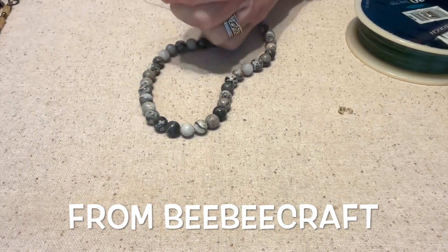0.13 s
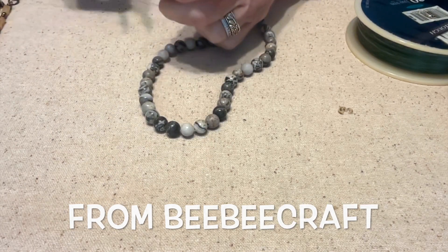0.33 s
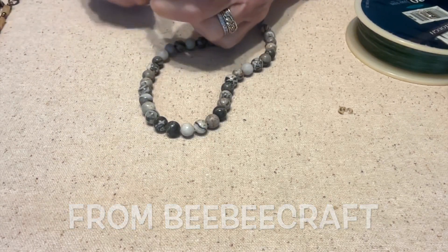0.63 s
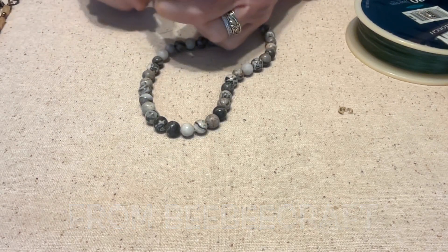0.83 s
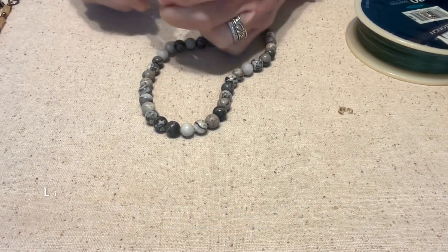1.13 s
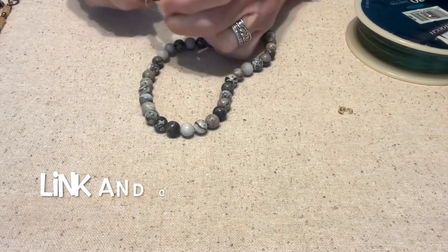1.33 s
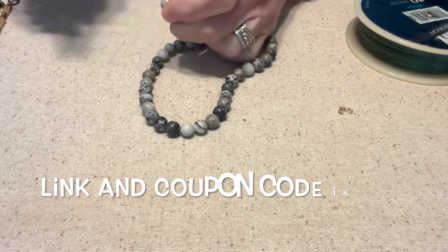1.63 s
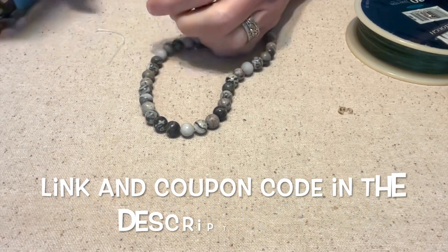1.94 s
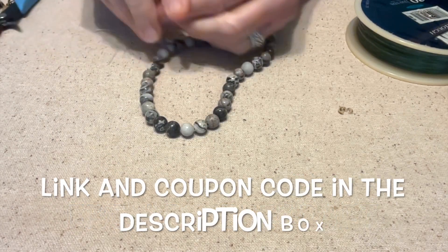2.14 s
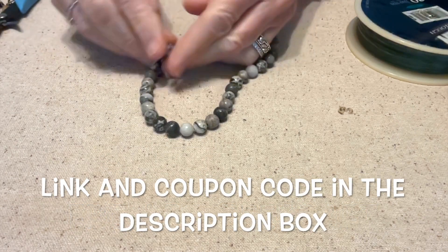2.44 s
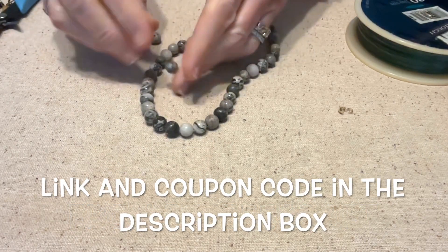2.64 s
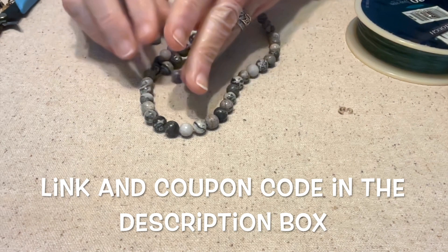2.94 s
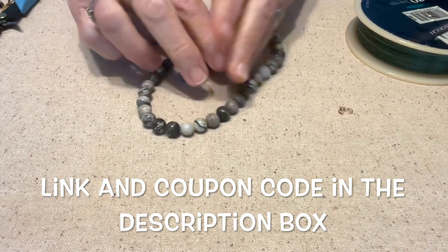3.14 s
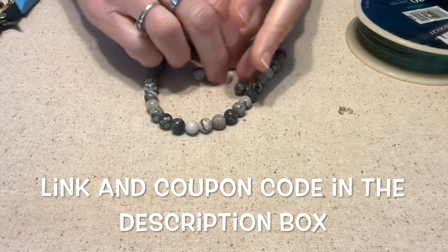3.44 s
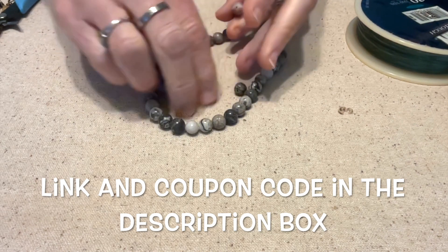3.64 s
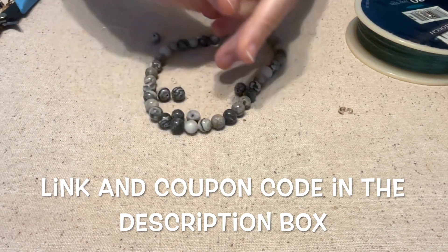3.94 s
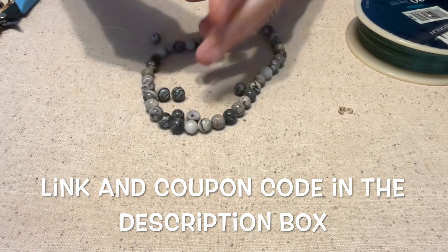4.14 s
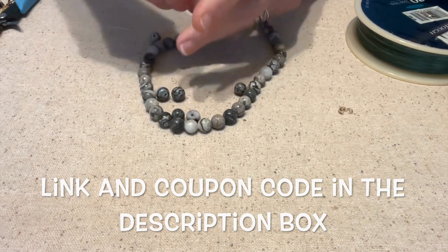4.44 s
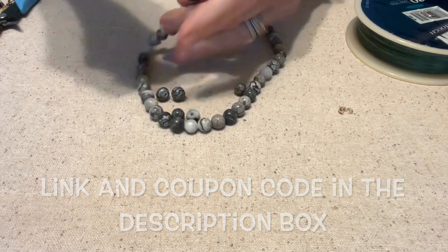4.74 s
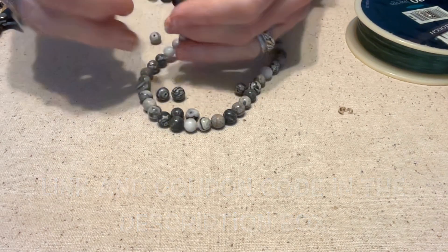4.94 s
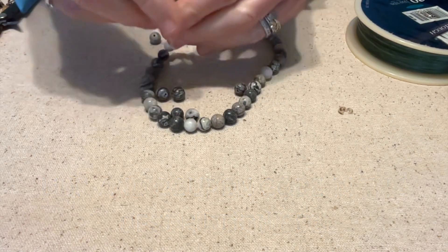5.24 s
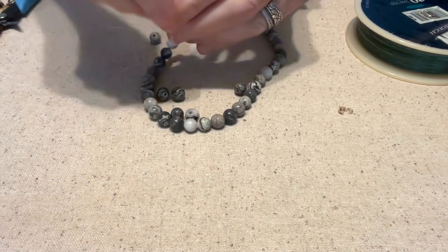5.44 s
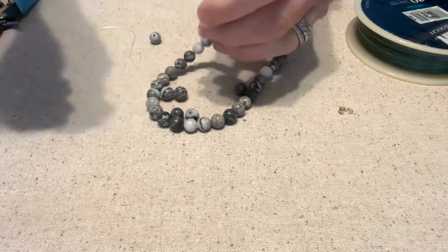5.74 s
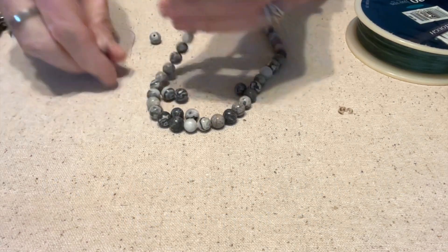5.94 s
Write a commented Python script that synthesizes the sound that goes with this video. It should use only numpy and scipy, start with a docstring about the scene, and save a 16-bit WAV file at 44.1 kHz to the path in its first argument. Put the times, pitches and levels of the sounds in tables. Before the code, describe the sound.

A small, quiet indoor room with faint low rumble and hiss, heard close in mono. At 0 seconds there is a soft, dull bump and brief cloth rub, then tiny bead ticks around 0.3 to 0.5 and faint metal ticks at 0.65 and 0.83. At 1.45 a hard, bright steel snap, like cutters going through wire, far louder than everything else, bounces briefly off the walls. From 1.92 to 2.15 the tool is laid down: a woody double knock, low thump and short rattle. Fingers rub softly over cloth from 2.2 to 3.8, with crisp stone clicks at 2.9 and a busy cluster from 3.4 to 3.96. Sparser clicks and light taps follow, clearest at 4.73, then a small tap and clicks at 5.6 to 5.72. A last sharp bead clack comes at 6.06 amid soft brushing.

```python
"""Beads and cutters on a cloth-covered table

Stone beads are handled close to the microphone in a small, quiet room: contact pulses, with rebounds, click.
A sharp snap, likely cutters going through beading wire, rings steel modes and spreads to the walls.
The tool is put down with a knock and a rattle: force pulses drive table modes, noise bursts clatter.
Fingers brush the cloth throughout, as shaped and resonated random slips, and loose beads click on the strand."""
import sys
import numpy as np
from scipy import signal
from scipy.fft import rfft, irfft
from scipy.io import wavfile

SR = 44100
rng = np.random.default_rng(int(sys.argv[2]) if len(sys.argv) > 2 else 0)


def store_pcm(level_fs):
    """Save levels as 16-bit WAV."""
    pcm = np.round(np.clip(level_fs, -1, 1) * 32767).astype(np.int16)
    wavfile.write(sys.argv[1], SR, np.atleast_2d(pcm).T)


N = 268392
TIME = np.arange(N) / SR
CLACK_HZ = 9000  # pitch of a typical bead click

# fingers sweep over the cloth, levels before the stroke's arch and any trim:
# [start t/s, length t/s, rub level/dB, brush level/dB, brush pitch f/Hz, fizz level/dB]
STROKES = [(0, 0.062, -59, -71, 920, -69), (0.327, 0.1, -99, -99, 5250, -71.5),
           (2.199, 0.13, -77, -72, 1264, -68.5), (2.392, 0.19, -66.5, -75, 1410, -72.5),
           (2.56, 0.35, -88, -74, 1170, -85.5), (2.645, 0.13, -67.5, -70.5, 373, -85),
           (2.744, 0.17, -64.5, -71, 1193, -74.5), (2.872, .14, -69, -72, 1090, -88),
           (3.118, 0.095, -85, -72, 568, -94.5), (3.168, .17, -83.5, -75.5, 1326, -76),
           (3.342, 0.18, -71, -77.5, 1136, -79.5), (3.505, 0.066, -60.5, -64.5, 1180, -72),
           (3.537, 0.059, -60, -69, 750, -63), (3.574, 0.24, -66.5, -72, 920, -68),
           (4.343, 0.11, -88, -82, 1206, -78), (4.573, 0.098, -71.5, -85, 1200, -82.5),
           (5.122, .09, -67.5, -91, 1070, -86), (5.31, 0.14, -80.5, -84, 1090, -82.5),
           (5.448, 0.18, -80, -81.5, 1315, -74), (5.6, 0.096, -66, -74, 2480, -71),
           (5.678, 0.068, -85, -74, 2423, -63), (5.949, 0.69, -65.5, -70, 1111, -72.5)]
# spectrum of a light tap, relative: [f/Hz, level/dB]
TAP_SPECTRUM = [(100, -19.5), (360, 1), (580, 1.5), (830, -3.5), (1250, -10.5), (1900, -25.5), (2800, -25),
                (5000, -34), (10000, -40)]


def amp(db):
    """Level to amplitude: 20 dB is a factor of ten."""
    return 10 ** (np.asarray(db) / 20)


def evened(x):
    """Power normalization: scales to rms 1."""
    return x / np.sqrt(np.mean(x ** 2) + 1e-20)


def read(points, hz):
    """Interpolates (f/Hz, value) points linearly on a logarithmic frequency axis."""
    f, value = np.transpose(points)
    return np.interp(np.log(hz + 1), np.log(f + 1), value)


def add(mix, s, sound):
    """Superposition: mixes a sound in at time s."""
    part = mix[max(round(s * SR), 0):][:len(sound)]
    part += sound[:len(part)]


def coloured(x, spectrum):
    """Linear filtering: weights the spectrum of x, then scales to rms 1."""
    gain = amp(read(spectrum, np.fft.rfftfreq(len(x), 1 / SR)))
    return evened(irfft(rfft(x) * gain, len(x)))


def causal(db):
    """Minimum phase: the most compact pulse with this spectrum and nothing before its start."""
    log_gain = np.log(amp(np.r_[db, db[-2:0:-1]]))
    minimum_phase = np.exp(np.conj(signal.hilbert(log_gain)))
    return irfft(minimum_phase[:len(db)])


def ring(modes, t):
    """Modal superposition: dying sines, neighbouring modes swinging in opposite directions."""
    return sum((-1) ** k * amp(db - 60 * t / t60) * np.sin(2 * np.pi * hz * t)
               for k, (hz, db, t60) in enumerate(modes))


def crowded(spectrum, t60):
    """High modal density: modes too many to tell apart become fresh decaying noise."""
    t = np.arange(SR // 4) / SR
    return coloured(rng.standard_normal(len(t)), spectrum) * amp(-60 * t / t60)


def struck(events, modes, detune=0.056):
    """Modal excitation: each contact shifts the modes at random and tilts their levels per octave."""
    out, t = np.zeros(N), np.arange(SR // 10) / SR
    hz, level, t60 = np.transpose(modes)
    for (s, db, tilt_db), shift in zip(events, rng.standard_normal((len(events), len(modes)))):
        levels = level + tilt_db * np.log2(hz / hz[0])
        ping = ring(zip(hz * np.exp(detune * shift), levels, t60), t)
        add(out, s, amp(db) * ping / abs(ping).max())
    return out


def light_contacts(events, spectrum, contact_db):
    """Impulse response: one contact pulse over crowded modes that die with no clear pitch."""
    out, pulse = np.zeros(N), causal(read(spectrum, np.fft.rfftfreq(1024, 1 / SR)))
    for s, db, t60 in events:
        tap = crowded(spectrum, t60)
        add(out, s, amp(db) * tap / abs(tap).max())
        add(out, s, amp(db + contact_db) * pulse / abs(pulse).max())
    return out


def room(x, wet_db, build_s):
    """Diffuse reverberation: reflections swell briefly, then decay at a rate set by frequency."""
    # reverberation time: [f/Hz, t60/s]
    decay_times = [(100, 0.91), (500, 0.31), (2000, 0.21), (5500, 0.22), (9000, 0.23), (15000, 0.29)]
    hz, t, z = signal.stft(rng.standard_normal(SR // 2), SR, nperseg=256)
    decay = amp(-60 * t / read(decay_times, hz)[:, None])
    tail = signal.istft(z * decay, SR, nperseg=256)[1]
    tail *= 1 - np.exp(-(np.arange(len(tail)) / SR / build_s) ** 2)
    return amp(wet_db) * signal.fftconvolve(x, tail / np.linalg.norm(tail))[:N]


def near_echo(x, delay_s, echo_db):
    """Specular reflection: one delayed copy from a surface close above the table."""
    return x + amp(echo_db) * np.interp(TIME - delay_s, TIME, x, left=0)


def wander(rate_hz):
    """Band-limited randomness: a Gaussian low-pass leaves a smooth curve of rms 1."""
    below = np.exp(-(np.fft.rfftfreq(N, 1 / SR) / rate_hz) ** 2)
    return evened(irfft(rfft(rng.standard_normal(N)) * below, N))


def slips(size, grain_db=0.5, slips_per_s=4000):
    """Stick-slip friction: skin and beads catch on the weave in tiny slips at random instants."""
    force = rng.standard_normal(size)
    boost = amp(grain_db * np.minimum(rng.exponential(1, size), 5))  # a few slips stand out
    occurs = rng.random(size) < slips_per_s / SR
    return force * boost * occurs


def resonate(x, hz, width_hz):
    """Heterodyning: a one-pole resonance follows the curve hz."""
    turn = np.exp(2j * np.pi * np.cumsum(hz) / SR)
    r = np.exp(-np.pi * width_hz / SR)
    return 2 * (turn * signal.lfilter([1 - r], [1, -r], x / turn)).real


def arch(share):
    """Contact pressure: one arch a stroke, peaking before its middle."""
    skew, power = 0.56, 0.99  # skew under 1 peaks early; a higher power narrows the arch
    return abs(np.sin(np.pi * np.clip(share, 0, 1) ** skew)) ** power


def pressure():
    """Friction follows normal force: gains of the low rub and of the fizz over time."""
    rub, fizz = np.zeros(N), np.zeros(N)
    for start, length, rub_db, _, _, fizz_db in STROKES:
        press = arch(np.arange(0, length, 1 / SR) / length)
        add(rub, start, amp(rub_db) * press)
        add(fizz, start, amp(fizz_db) * press)
    return rub, fizz


def background(air_db=-68.5):
    """Stationary noise: steady room rumble and hiss with a trace of electrical whine."""
    # quiet room and microphone hiss, relative density: [f/Hz, level/dB per Hz]
    air_spectrum = [(20, -18.5), (42, -9.5), (70, -1), (105, -11), (165, -15), (290, -17.5), (500, -20),
                    (720, -24.5), (1800, -30), (3000, -37), (5000, -36), (8200, -24.5), (11500, -41.5),
                    (14000, -28.5), (16000, -40)]
    # faint electrical tones: [f/Hz, rms level/dB]
    whines = [(3747, -94), (5243, -107), (5604, -100.5)]
    air = amp(air_db) * coloured(rng.standard_normal(N), air_spectrum)
    whine = sum(np.sqrt(2) * amp(db) * np.sin(2 * np.pi * hz * TIME) for hz, db in whines)
    return air + whine


def cloth(fizz_trim_db=-1, flutter_db=1.5):
    """Friction noise: fingers stir the table in a low rub and the threads in a fizz; the level flutters."""
    # relative densities of rub and fizz: [f/Hz, level/dB per Hz]
    rub_spectrum = [(30, 2.5), (100, 11), (300, -3.5), (600, -6.5), (1150, -6.5), (2000, -21.5),
                    (4000, -17), (7000, -39)]
    fizz_spectrum = [(2000, 3), (2600, 0), (5000, 1.5), (9000, 12.5), (12000, -3.5), (14500, 13),
                     (16500, -13)]
    rub_gain, fizz_gain = pressure()
    rub = rub_gain * coloured(slips(N), rub_spectrum)
    fizz = amp(fizz_trim_db) * fizz_gain * coloured(slips(N), fizz_spectrum)
    return (rub + fizz) * amp(flutter_db * wander(rate_hz=85))


def brushes(width=0.9, rise_octaves=0.99, waver_octaves=0.27):
    """Filtered friction: fingertips hiss over the weave at a rising, wavering resonance."""
    out, waver = np.zeros(N), wander(rate_hz=14)
    for start, length, _, db, hz, _ in STROKES:
        share = np.arange(0, length, 1 / SR) / length
        drift = waver_octaves * np.interp(start + share * length, TIME, waver)
        pitch = hz * 2 ** (rise_octaves * (share - .5) + drift)
        hiss = slips(len(share))
        for _ in range(2):
            hiss = resonate(hiss, pitch, width * hz)
        add(out, start, amp(db) * arch(share) * evened(hiss))
    return out


def table_blows(board_db=-19, board_t60=0.12):
    """Force bandwidth: pulses rounded by the cloth ring the top; softer blows reach only its low modes."""
    # from soft fingertips to the hard tool: [t/s, drive level/dB, corner of the force f/Hz]
    blows = [(.002, -26, 65), (0.046, -12, 25), (0.069, -48, 1090), (1.4495, -48.5, 599),
             (1.9216, -18.5, 297), (1.9306, -27.5, 270), (1.9604, -13, 640), (1.9697, -21, 1975),
             (2.0027, -11, 113), (2.059, -33.5, 630), (2.0755, -27, 58), (2.0964, -29.5, 208),
             (2.1337, -28.5, 67.4), (2.1985, -24, 62.5), (2.944, -33.5, 87.6), (2.954, -37, 84),
             (3.56, -28, 30.8), (3.661, -35.5, 30.2), (3.761, -39, 93), (3.771, -40.5, 93),
             (4.814, -32.5, 43.8), (5.318, -42.5, 70), (5.6, -65.5, 924), (5.621, -42, 31.7),
             (6.051, -35.5, 128)]
    # separate modes of the table top: [f/Hz, relative level/dB, t60/s]
    top_modes = [(35.5, -21, 0.93), (52.9, -20, 0.63), (80.6, -17.5, 0.47), (93.2, -0.9, 0.065),
                 (112, -13.0, 0.366), (128, -9, 0.133), (165.3, 5, 0.13), (173.8, 4.5, 0.086),
                 (229, -23.5, 0.279), (263.3, -7, 0.22), (325.4, -2.5, 0.068), (356, -19.5, 0.198),
                 (407.6, -3.5, 0.12), (479, -10, 0.07), (542, -12, 0.102), (656.4, -21, 0.16),
                 (699, -18, 0.11), (705.1, -3, 0.043), (775, -7.5, 0.05), (864, -7.5, 0.043),
                 (956.5, -10.5, 0.052), (1067.9, -16, 0.068)]
    # its crowded higher modes, relative: [f/Hz, level/dB]
    board_spectrum = [(100, -36), (400, -20.5), (650, -6.5), (880, 0), (1060, -1.5), (1250, -3.5),
                      (2000, -8.5), (4000, -14), (8000, -34)]
    out, t = np.zeros(N), np.arange(SR) / SR
    low_modes = ring(top_modes, t)
    for s, db, hardness_hz in blows:
        u = 2 * np.pi * hardness_hz * t[:SR // 10]
        force = u ** 2 * np.exp(-u)
        push = force * amp(db) / force.sum()
        add(out, s, signal.fftconvolve(push, low_modes))
        add(out, s, signal.fftconvolve(push, amp(board_db) * crowded(board_spectrum, board_t60)))
    return out


def table_taps():
    """Weak impact: light taps on the cloth-covered top excite a brief, unpitched response."""
    # [t/s, peak level of the decaying part/dB, t60/s]
    taps = [(.0694, -49.5, 0.17), (2.0592, -45, 0.081), (2.096, -52, 0.25), (2.914, -54, .047),
            (3.083, -69, 0.028), (3.5462, -58, .045), (3.738, -59, .025), (4.2072, -51.5, 0.046),
            (5.6002, -47.5, 0.057), (5.7182, -53.5, 0.016)]
    return light_contacts(taps, TAP_SPECTRUM, contact_db=-7)


def rebounds(s, db, gap_s, shrink, loss_db, rest_s):
    """Inelastic rebound: contacts (s, dB) come sooner and weaker until the gap is too short, at most six."""
    contacts = [(s, db)]
    while gap_s > rest_s and len(contacts) < 6:
        s, db, gap_s = s + gap_s, db - loss_db, gap_s * shrink
        contacts.append((s, db))
    return contacts


def nudges(still_db=-80):
    """Poisson process: moving fingers jostle beads, louder under more fizz: (s, peak dB, pitch Hz)."""
    per_s, over_fizz_db, spread_db = 20, 12.5, 5  # level over the fizz before its trim
    fizz_db = 20 * np.log10(pressure()[1] + 1e-9)
    at = np.flatnonzero((rng.random(N) < per_s / SR) & (fizz_db > still_db))
    return [(i / SR, fizz_db[i] + over_fizz_db + spread_db * size, CLACK_HZ * np.exp(.12 * pitch))
            for i, (size, pitch) in zip(at, rng.standard_normal((len(at), 2)))]


def beads(scatter_db=-6, scatter_t60=0.012):
    """Stiff impact: stone hardly rings; each contact is a short pulse scattered by fingers and nearby beads."""
    # bead meets bead: [t/s, peak level/dB, pitch f/Hz, time to first rebound t/s (none at or below rest_s),
    # focus (under 1 a broad clack, over 1 a thin tick)]
    bead_hits = [(.256, -45, 9800, 0.0073, 1.5), (.301, -40.5, 8400, 0.0046, 1.3),
                 (.47, -52, 10000, 0.0048, 2.5), (2.914, -23, 9700, 0.0054, 1.05),
                 (2.9445, -25.5, 9400, .0038, 0.95), (3.14, -42, 8900, 0.0094, 0.89),
                 (3.3969, -31, 10430, 0, 0.8), (3.5461, -35, 7000, 0.0025, 0.43),
                 (3.645, -44, 11610, 0, 1.2), (3.667, -40, 10510, 0, 0.99),
                 (3.6891, -27, 10200, 0.006, 1.26), (3.7, -29, 9800, .004, 0.79),
                 (3.738, -21, 9000, 0, 0.97), (3.758, -36, 10850, 0.00064, 1.3),
                 (3.765, -28.5, 9500, 0.013, .9), (3.845, -24, 9060, 0.001, 0.89),
                 (3.9564, -33.5, 9070, 0, 0.85), (4.207, -38.5, 9310, 0.0079, 1.6),
                 (4.3834, -42.5, 7060, .0014, 0.52), (4.5336, -42, 8150, 0.0028, 0.81),
                 (4.7298, -24.5, 9360, .0036, 0.9), (4.756, -42, 9000, 0.00069, 1.2),
                 (4.8131, -37.5, 9160, 0.0077, 0.95), (4.822, -36, 9100, 0.0099, 0.84),
                 (5.5972, -38, 8200, 0.0031, 0.92), (5.5998, -31, 7300, 0.0062, 0.66),
                 (5.718, -30.5, 10660, 0.0015, 1.37), (6.063, -23.5, 10020, 0, 1.3),
                 (6.064, -23, 10040, 0.0014, 1.18), (6.0648, -31, 9400, 0.01, 1)]
    # relative spectrum at pitch CLACK_HZ and focus 1: [f/Hz, level/dB]
    clack_spectrum = [(200, -5.5), (1000, -17.5), (2500, -14), (4000, -9.5), (5500, -10), (7000, -2.5),
                      (9000, 2.5), (10500, -4), (12500, -5.5), (15000, -11), (20000, -4), (26000, -12),
                      (36000, -29)]
    out, hz, t = np.zeros(N), np.fft.rfftfreq(512, 1 / SR), np.arange(512) / SR
    contacts = []
    for start, first_db, pitch, gap_s, focus in bead_hits:
        for s, db in rebounds(start, first_db, gap_s, shrink=0.46, loss_db=11.5, rest_s=.0022):
            contacts.append((s, db, pitch, focus))
    contacts += [(s, db, pitch, 1) for s, db, pitch in nudges()]
    for s, db, pitch, focus in contacts:
        paths = rng.standard_normal(len(t)) * amp(-60 * t / scatter_t60)
        paths *= amp(scatter_db) / np.linalg.norm(paths)
        paths[0] = 1  # the direct path
        pulse = causal(focus * read(clack_spectrum, hz * CLACK_HZ / pitch))
        click = np.convolve(pulse, paths)
        add(out, s, amp(db) * click / abs(click).max())
    return near_echo(out, delay_s=0.0027, echo_db=-13.0)


def tool_pings():
    """Modal excitation: light touches ring the open steel tool."""
    # touches: [t/s, peak level/dB, tilt/dB per octave]
    touches = [(.6473, -41.5, 0.5), (.6499, -53, -4.5), (.656, -53, 4), (.666, -50, -1), (.8285, -40, 0.5),
               (.834, -55, -1), (.845, -55, -0.5), (2.1157, -42.5, -4), (2.242, -38.5, 3), (3.97, -42, 18)]
    # modes of the open tool: [f/Hz, relative level/dB, t60/s]
    tool_modes = [(1270, -9.5, 0.012), (1790, -5, 0.011), (2920, 3, 0.0054), (4130, 1, 0.012),
                  (5170, 2, 0.0099), (6300, -1, 0.0096), (9640, 2.5, 0.0075), (13370, 4, .005)]
    return struck(touches, tool_modes)


def scuffs(width=0.38, fall_octaves=0.32):
    """Stick-slip: a fingertip or bead catches on the weave in sparse, coarse slips that sink in pitch."""
    # [start t/s, length t/s, level before the arch/dB, mid-scuff pitch f/Hz]
    drags = [(1.041, 0.033, -76, 1420), (2.432, 0.035, -75, 980), (2.441, 0.11, -78.5, 2200),
             (2.64, 0.067, -76.5, 744), (2.695, 0.044, -82, 1920), (2.787, 0.095, -73, 1040),
             (2.77, .09, -78, 2670), (3.136, 0.048, -74.5, 660), (3.231, 0.037, -75, 1280),
             (3.514, 0.031, -66.5, 2130), (3.577, 0.043, -76, 2000), (3.679, 0.053, -69, 2560),
             (4.603, 0.058, -79.5, 1290), (5.15, 0.047, -78, 736), (5.33, 0.045, -80, 1170),
             (5.369, 0.025, -76, 700), (5.465, 0.037, -76.5, 1250), (5.647, 0.024, -74.5, 3400),
             (5.696, 0.026, -67.5, 2400)]
    out = np.zeros(N)
    for start, length, db, hz in drags:
        share = np.arange(0, length, 1 / SR) / length
        pitch = hz * 2 ** (fall_octaves * (.5 - share))
        rasp = slips(len(share), grain_db=1.0, slips_per_s=700)
        for _ in range(2):
            rasp = resonate(rasp, pitch, width * hz)
        add(out, start, amp(db) * arch(share) * evened(rasp))
    return out


def cutters(walls_db=-6.0, jaw_bounce_s=.00056, bounce_db=-4, body_db=-38):
    """Impact and radiation: jaws meet twice and ring the steel; walls return the sound of all directions."""
    # the jaws shut on the wire: [t/s, peak level of the first contact's steel ring/dB]
    snaps = [(1.4495, -2.5)]
    # modes of the cutters: [f/Hz, relative level/dB, t60/s]
    steel_modes = [(340, -29.5, 0.012), (1255, -24.5, 0.0064), (2018, -19.5, 0.011), (3439, -21, 0.0075),
                   (5010, -29, 0.0039), (5288, -20.5, 0.012), (5760, -22.5, 0.01), (6940, 0, 0.0024),
                   (8770, 1.5, 0.0028), (9390, 0.5, 0.005), (10900, -14, 0.0021), (11990, -11, 0.0036),
                   (14000, -19, 0.006), (15434, -23, 0.0053)]
    # the sprung handles ring on faintly: [f/Hz, level relative to the snap's/dB, t60/s]
    handle_modes = [(1780.6, -54, .22), (2016, -52, 0.23), (3730, -55, .15), (5330, -47, 0.18),
                    (5834, -47.5, .2), (9060, -45.5, 0.12)]
    # the snap summed over all directions, relative, as it reaches the walls: [f/Hz, level/dB]
    spread_spectrum = [(100, -14), (350, -16.5), (800, -20), (1400, -13.5), (2050, -11), (2700, -20),
                       (3500, -8.5), (4300, -10), (5400, 2), (6300, -7), (7800, -8), (9000, -0.5),
                       (10800, -8), (14500, -14.5), (17000, -22)]
    direct, outward, t = np.zeros(N), np.zeros(N), np.arange(SR // 20) / SR
    pulse = causal(read(spread_spectrum, np.fft.rfftfreq(1024, 1 / SR)))
    for s, db in snaps:
        snap = ring(steel_modes, t)
        snap *= amp(db) / abs(snap).max()
        add(direct, s, snap)
        add(direct, s + jaw_bounce_s, amp(bounce_db) * snap)
        add(direct, s, amp(db + body_db) * crowded(TAP_SPECTRUM, t60=0.009))  # the grips jolt
        add(direct, s, amp(db) * ring(handle_modes, TIME[:SR // 4]))
        add(outward, s, amp(db) * pulse / np.linalg.norm(pulse))
    walls = room(outward, walls_db, build_s=0.0081) + room(direct, wet_db=-19.5, build_s=0.014)
    return near_echo(direct, delay_s=.0022, echo_db=-17.0) + walls


def tool_rattle():
    """Repeated impact: loose parts of the tool clatter as it lands and settles."""
    # [t/s, peak level of the decaying part/dB, t60/s]
    rattles = [(1.9183, -25.5, 0.02), (1.9285, -37, 0.029), (1.9618, -30.5, .025), (1.9665, -47, 0.019),
               (1.972, -39, 0.016), (2.0225, -41, 0.0335), (2.0272, -43, 0.071), (2.048, -47.5, 0.065),
               (2.126, -56.5, 0.19), (2.154, -55.5, .05)]
    # relative spectrum: [f/Hz, level/dB]
    clatter_spectrum = [(700, -23), (1250, -14), (1700, -15), (2100, -9), (2700, -21.5), (3300, -4.5),
                        (3900, -14), (5300, -6), (6300, -7), (7500, -9.5), (8400, -8), (9500, -2.5),
                        (11000, -6.5), (13500, -15), (16000, -16.5)]
    return light_contacts(rattles, clatter_spectrum, contact_db=-5)


def strand_shifts():
    """Modal excitation: beads shifting along the taut wire ring the strand."""
    # [t/s, peak level/dB, tilt/dB per octave]
    shifts = [(3.5462, -42, -5), (4.3832, -47.5, 1), (4.8221, -48.5, -2), (4.888, -55, -1.5),
              (5.6005, -45, -5.5), (5.6495, -55.5, -4), (5.663, -58, 6), (5.676, -59, -2), (5.684, -53, 8),
              (5.7045, -50, -3), (5.708, -57, -4), (5.7182, -48, 13), (5.7212, -39, 0.5)]
    # modes of the strand: [f/Hz, relative level/dB, t60/s]
    strand_modes = [(1120, -7, 0.0081), (1710, -9, 0.0054), (2590, -3, 0.0079), (3530, -8.5, 0.0096),
                    (4230, -4.5, 0.0059), (7160, 0.5, 0.012), (8450, 3.5, 0.0089), (12600, 4, .003)]
    return struck(shifts, strand_modes)


def scene():
    """Superposition: all sources with their share of the room, in mono."""
    clicks = beads() + tool_pings() + strand_shifts()
    knocks = table_blows() + table_taps()
    rattle = tool_rattle()
    reflections = room(clicks, wet_db=-10.5, build_s=0.0063)
    reflections += room(knocks, wet_db=-26.5, build_s=0.0066)
    reflections += room(rattle, wet_db=-6.0, build_s=0.0015)
    friction = cloth() + brushes() + scuffs()
    mix = background() + friction + knocks + clicks + cutters() + rattle + reflections
    return mix[None]


def record(dry):
    """Band limiting: the microphone's low cut, then the recorder's upper limit."""
    low_cut_hz, edge_hz = 25, 16600
    low_cut = signal.butter(4, low_cut_hz, "highpass", fs=SR, output="sos")
    thinned = signal.sosfilt(low_cut, dry)
    band_limit = signal.firwin(255, edge_hz, window=("kaiser", 9), fs=SR)
    return signal.oaconvolve(thinned, band_limit[None], "same")


dry = scene()
out = record(dry)
store_pcm(out)
```